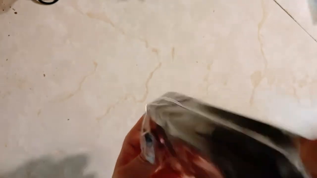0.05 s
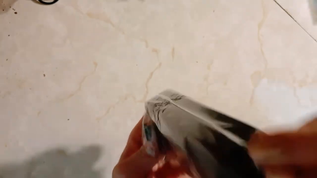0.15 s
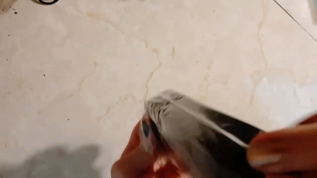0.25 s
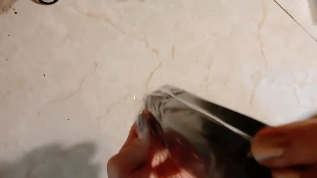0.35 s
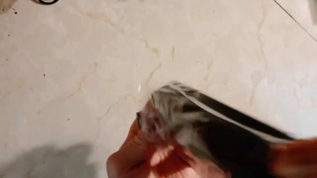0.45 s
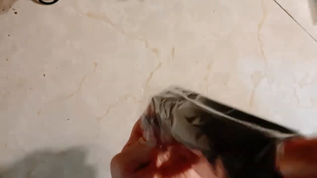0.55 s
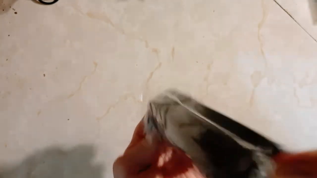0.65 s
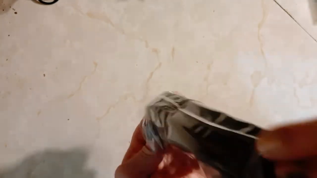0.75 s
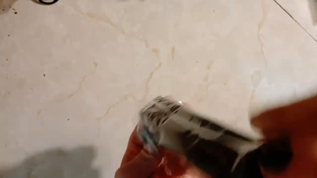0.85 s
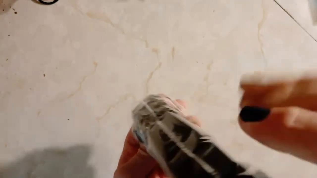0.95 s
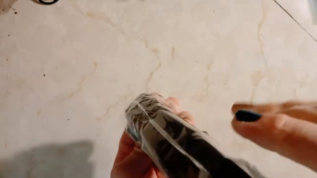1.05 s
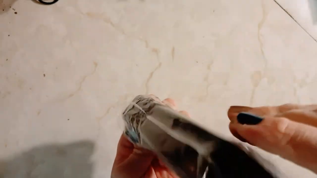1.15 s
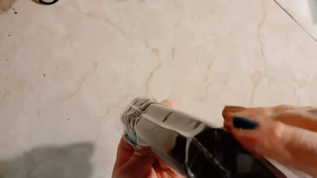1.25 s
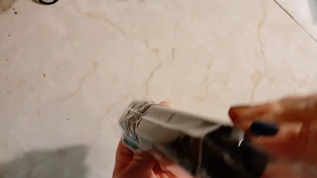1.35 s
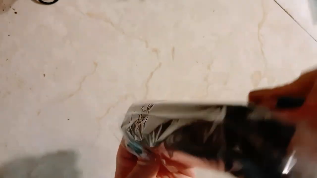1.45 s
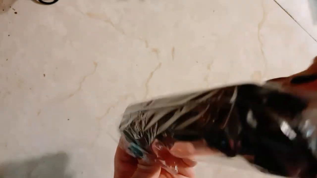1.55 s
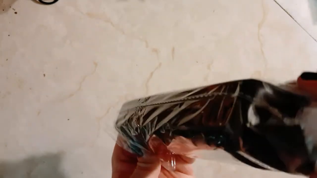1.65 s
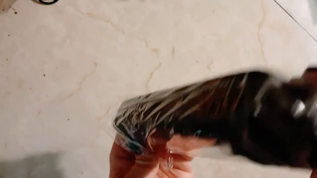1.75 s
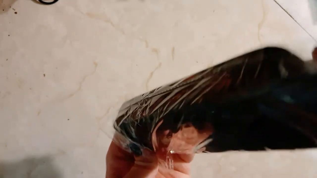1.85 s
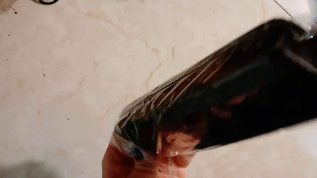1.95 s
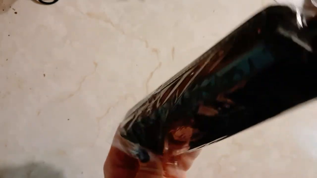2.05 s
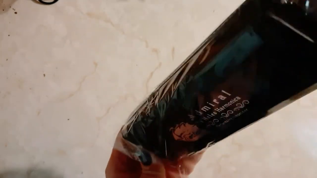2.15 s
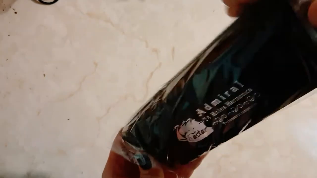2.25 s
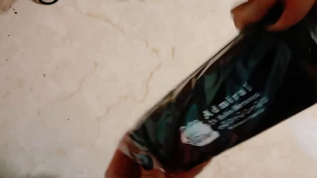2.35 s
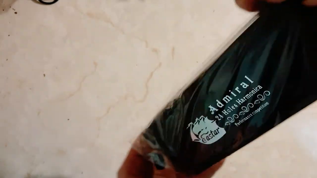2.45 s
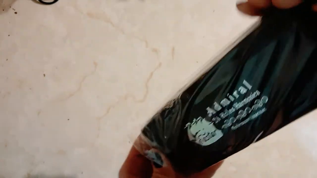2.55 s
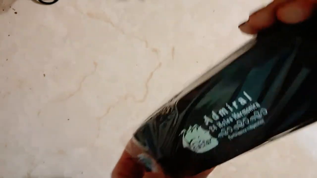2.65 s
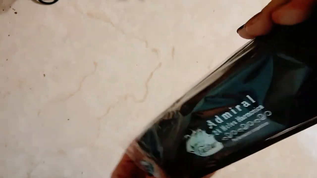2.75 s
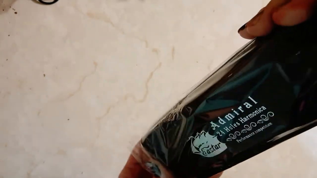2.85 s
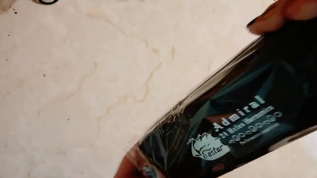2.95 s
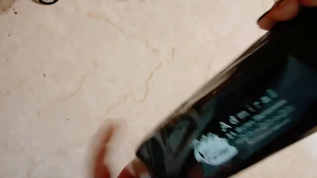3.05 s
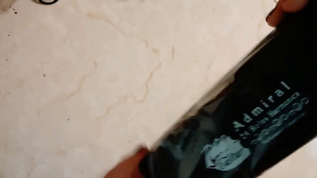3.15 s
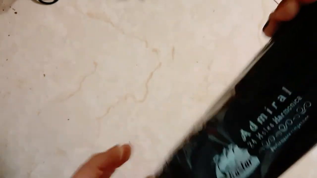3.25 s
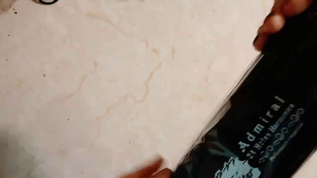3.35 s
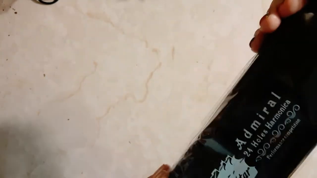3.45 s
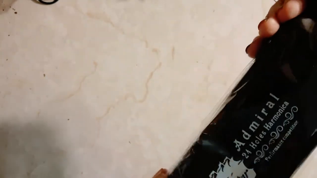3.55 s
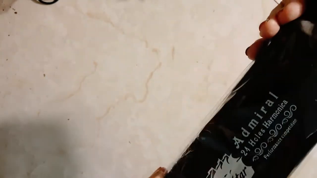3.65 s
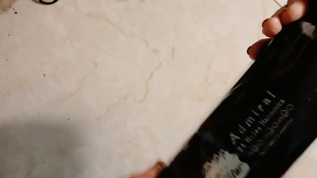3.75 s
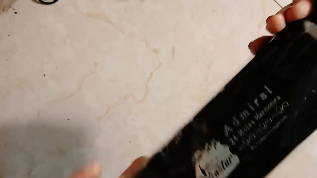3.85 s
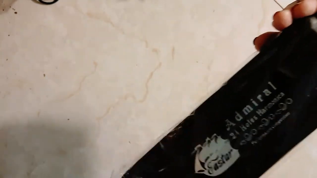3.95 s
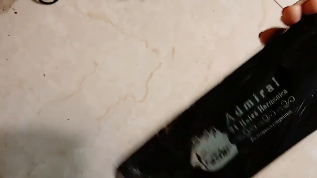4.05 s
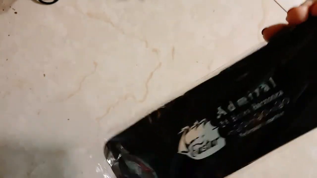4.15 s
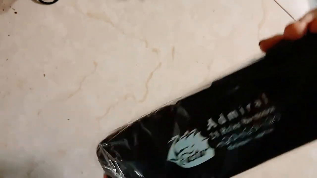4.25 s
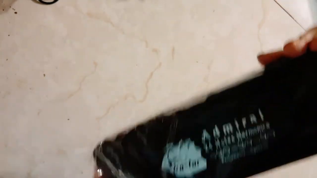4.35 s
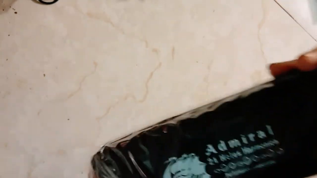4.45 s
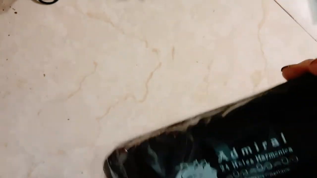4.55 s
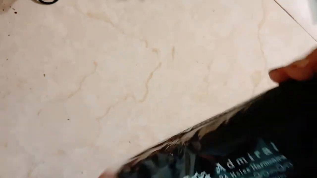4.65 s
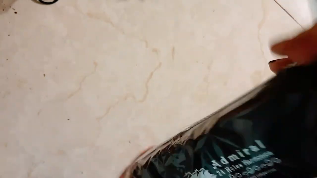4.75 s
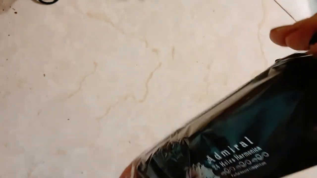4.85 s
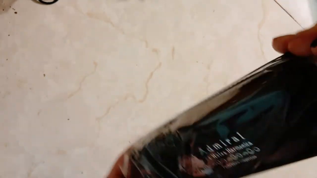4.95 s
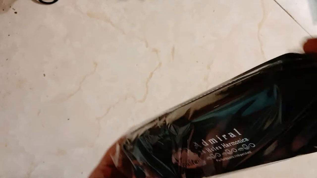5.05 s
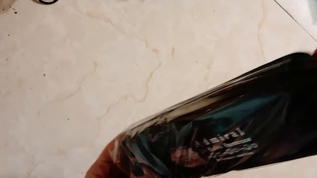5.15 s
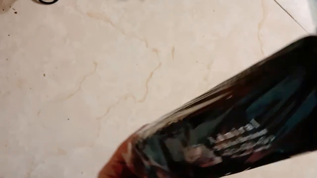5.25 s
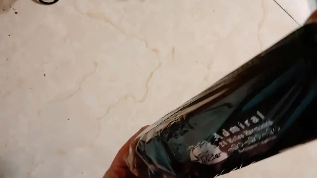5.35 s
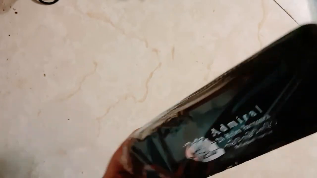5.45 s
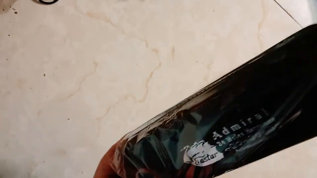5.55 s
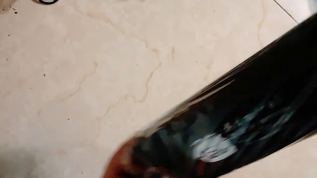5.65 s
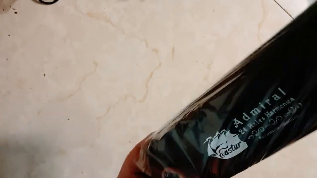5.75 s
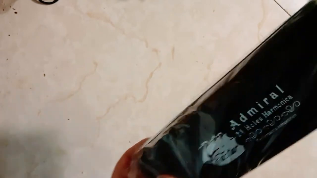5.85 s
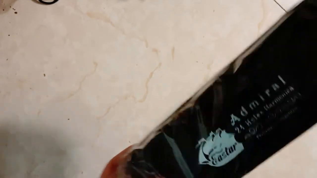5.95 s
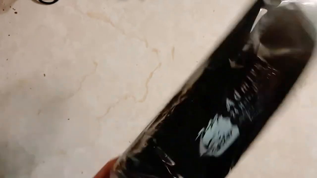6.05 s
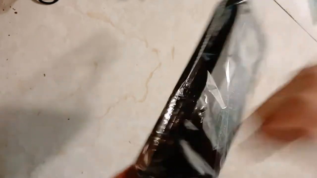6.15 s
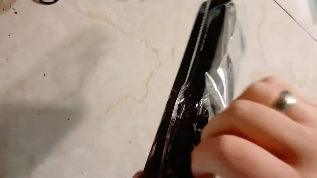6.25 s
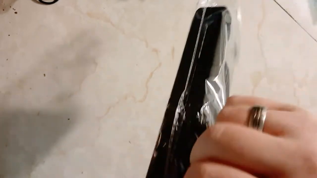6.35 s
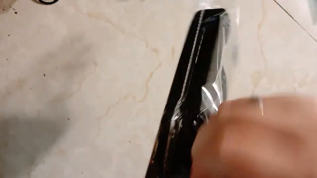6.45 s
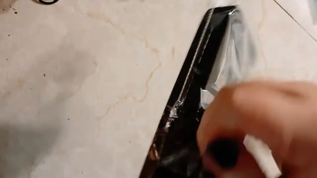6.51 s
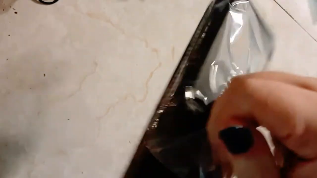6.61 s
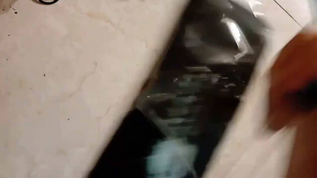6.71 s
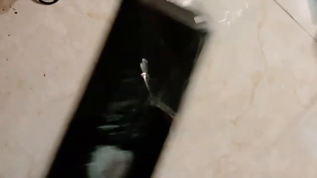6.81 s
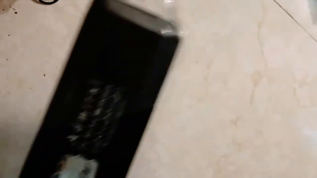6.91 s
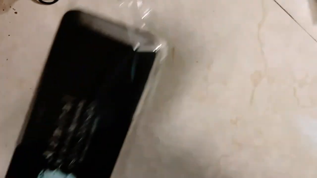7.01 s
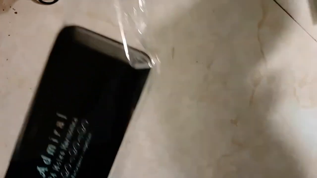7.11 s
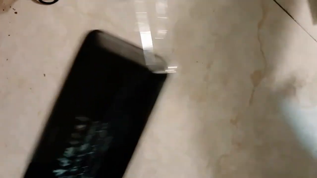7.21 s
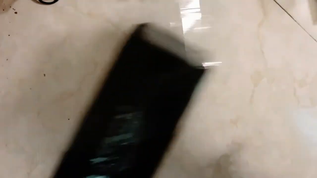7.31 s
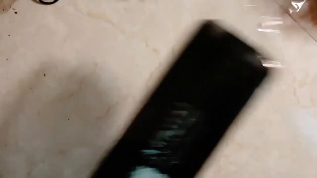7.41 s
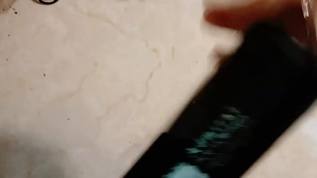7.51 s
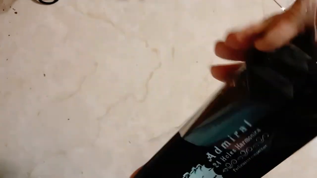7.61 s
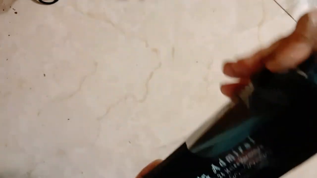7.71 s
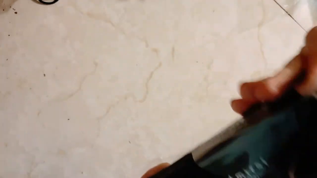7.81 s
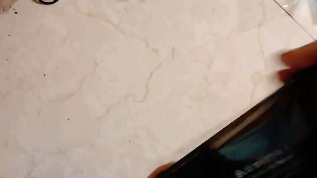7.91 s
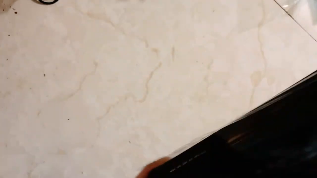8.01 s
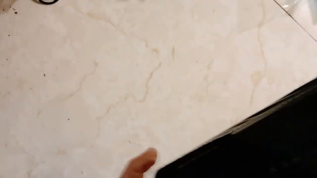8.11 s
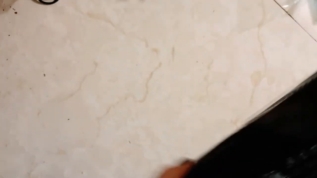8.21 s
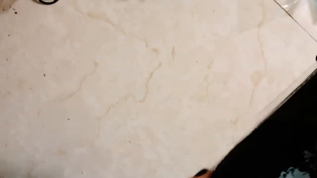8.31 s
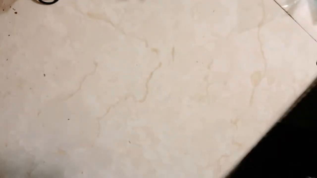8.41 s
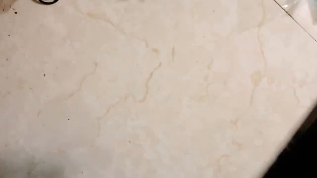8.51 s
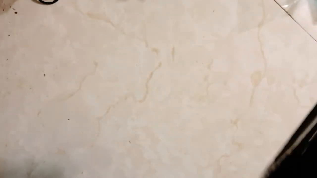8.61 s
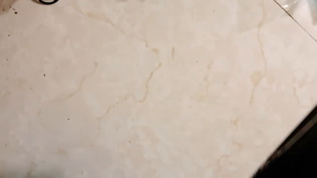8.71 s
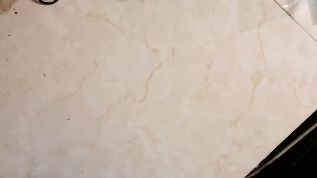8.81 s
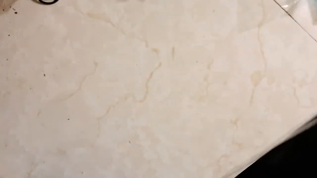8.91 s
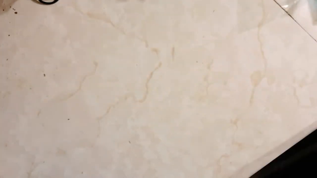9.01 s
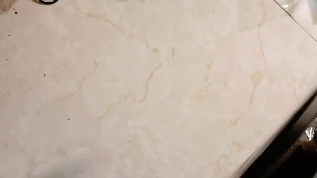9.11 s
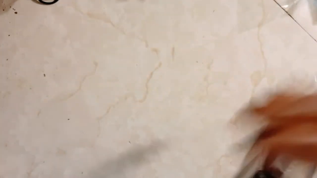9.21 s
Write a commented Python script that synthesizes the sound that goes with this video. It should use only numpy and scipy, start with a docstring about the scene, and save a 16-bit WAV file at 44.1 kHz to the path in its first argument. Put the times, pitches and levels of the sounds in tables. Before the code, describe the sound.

Stiff plastic film crackles and creases in quick handfuls close by, bursting into a violent ripping crunch late on, over faint room hum.

```python
"""Stiff film off a hard case

Hands crumple, tear and peel stiff plastic film, close to the left port of a phone, over a stone table.
Small creases (damped sines) follow the hands' effort; big ones snap as ring, crack and push; fingers bump the case.
The right port hears the film later, duller and more through the room; charged film pops in the left as leaky steps.
A mains hum of sines drones over noise-made room air, and the recorder's gain ducks after loud peaks."""
import sys
import numpy as np
from scipy import signal
from scipy.fft import rfft, irfft, next_fast_len
from scipy.io import wavfile
from scipy.ndimage import uniform_filter1d, map_coordinates

SR = 44100
rng = np.random.default_rng(int(sys.argv[2]) if len(sys.argv) > 2 else 0)


def materialize(psi):
    """Save the field psi as 16-bit PCM at rate SR to the path in sys.argv[1].

    A 1-D psi becomes a single channel; in a 2-D psi each row is a channel.
    """
    bounded = np.clip(np.atleast_2d(psi).T, -1, 1)
    quanta = np.round(bounded * 32767).astype(np.int16)
    wavfile.write(sys.argv[1], SR, quanta)


N = 408807

# mains hum partials: pitch_hz, level_db
HUM_PARTIALS = [(59.2, -48.5), (118.4, -62), (199.2, -68), (236.9, -69.5), (296, -83), (473, -73.5),
                (603, -79), (742, -73), (960, -82)]
# room air spectrum, rescaled later: freq_hz, relative_db
AIR_SPECTRUM = [(47, -32), (80, -19), (136, -5.5), (242, -14), (346, -23.5), (734, -21), (839, -20),
                (937, -19.5), (1460, -49), (4730, -70), (8050, -56), (12300, -53), (16000, -49)]
# left-right correlation of the air: freq_hz, correlation
AIR_LIKENESS = [(60, 0.59), (130, 0.78), (300, 0.016), (1000, 0.33)]
# steady rustle between crunches: time_s, level_db
RUSTLE_LEVEL = [(0.0, -30.5), (0.015, -43), (0.05, -42), (0.8, -71), (1.9, -80), (2.1, -47), (2.75, -48),
                (2.85, -57), (3.65, -52), (4.1, -62), (4.3, -67), (6.08, -44), (6.17, -74), (6.5, -43.5),
                (7.0, -49.5), (7.54, -78), (7.575, -64), (7.7, -43.5), (8.3, -76), (9.27, -50)]
# squeezes and pulls of the film: start_s, hold_s, bright_db, dull_re_bright_db
CRUNCHES = [(0.063, 0.027, -34.5, -5), (0.122, 0.065, -35.5, -5), (0.249, 0.006, -37.5, -5),
            (0.299, 0, -37.5, -6), (0.356, 0, -35.5, -6), (0.411, 0.0, -36, -5), (0.474, 0, -31.5, -6),
            (0.536, 0.0029, -32, -5.5), (0.592, 0, -34.5, -8.5), (0.664, 0, -33.5, -5),
            (0.741, 0.064, -39.5, -7.5), (0.893, 0.067, -44, -7), (1.001, 0.0069, -40, -8),
            (1.066, 0, -50, -15), (1.118, 0.0074, -44, -8.5), (1.198, 0.053, -41, -5),
            (1.328, 0.018, -40.5, -6), (1.347, 0.0074, -33.5, -8.5), (1.457, 0.11, -40.5, -11),
            (1.617, 0.06, -40.5, -8), (1.717, 0, -44, -14), (1.768, 0.0025, -44, -4), (1.83, 0, -42, -2.5),
            (1.912, 0.0, -50, -8), (1.968, 0.047, -36.5, -7), (2.223, 0.047, -35, -9.5),
            (2.385, 0.04, -35.5, -11), (2.45, 0.031, -40, -12), (2.564, 0, -45.5, 1.5),
            (2.677, 0.071, -42, -12), (2.756, 0.046, -53, -6), (2.93, 0.008, -48.5, -2),
            (2.999, 0.0034, -41.5, -8.5), (3.065, 0, -41.5, -11), (3.183, 0.068, -43.5, -15),
            (3.319, 0.0076, -38, -9.5), (3.393, 0.068, -48, -18), (3.48, 0.0066, -41, -23),
            (3.58, 0.0036, -27, -29), (3.792, 0.044, -42, -14), (3.915, 0.072, -38, -10.5),
            (4.075, 0.01, -47.5, -4), (4.182, 0, -53.5, -8), (4.289, 0, -33, -14), (4.353, 0.02, -36, -9.5),
            (4.442, 0, -35, -29), (4.545, 0.02, -43, -7), (4.648, 0, -39, -17), (4.727, 0.014, -40, -12),
            (4.784, 0.031, -41, -11), (4.864, 0.084, -41.5, -12), (5.004, 0.075, -45, -14),
            (5.117, 0.13, -48, -5), (5.246, 0, -35, -15), (5.286, 0, -35, -4.5), (5.378, 0, -46, -1),
            (5.505, 0.001, -38, -6), (5.616, 0.014, -58, -22), (5.673, 0.031, -39, -6.5),
            (5.808, 0, -51.5, 8.5), (5.996, 0.02, -33.5, -6.5), (6.175, 0.016, -55, -9),
            (6.238, 0, -56, -9), (6.303, 0.002, -62, 4), (6.37, 0.067, -53, -9), (6.47, 0.063, -40.5, -13),
            (6.533, 0.0039, -29, -1.5), (6.702, 0.075, -22, -6.5), (6.787, 0.003, -25, -7),
            (6.838, 0.057, -28, -6), (6.901, 0.046, -29.5, -10), (7.216, 0.022, -45.5, -10.5),
            (7.412, 0.0047, -57, -2), (7.51, 0.001, -63, -21), (7.603, 0, -30, -4),
            (7.781, 0.047, -37.5, -12), (7.949, 0.031, -32.5, -7.5), (8.133, 0.042, -40.5, -6.5),
            (8.268, 0.044, -49.5, -1), (8.426, 0.014, -44.5, -14), (8.488, 0.082, -49.5, -6),
            (8.613, 0.034, -48, -8), (8.752, 0.0076, -53.5, 1), (8.818, 0, -53, 4),
            (8.881, 0.001, -48.5, 0), (8.94, 0.05, -46, -5), (9.015, 0.017, -37, -9.5),
            (9.049, 0.0095, -35, -4), (9.082, 0, -35, -9.5), (9.131, 0.0078, -43, 1.5),
            (9.16, 0, -42.5, -5)]
# how freely the sheet flaps: time_s, level_db
FLAP_LEVEL = [(0, -50.5), (1.3, -49), (1.6, -55), (3.3, -60), (3.6, -49), (4.5, -56), (6.0, -70),
              (7.0, -51.5), (8.95, -61), (9.12, -56), (9.27, -48)]
# loudest creases, before colouring: start_s, level_db, pitch_hz, push_re_level_db
BIG_SNAPS = [(0.0606, -29, 7900.0, -8), (0.0965, -21, 8300, -13), (0.1245, -23, 7800.0, -17),
             (0.1346, -23, 10500.0, -15), (0.1826, -22, 10600.0, -14), (0.1898, -22, 7900.0, -15),
             (0.2419, -28, 8900.0, -23), (0.2904, -28, 10000.0, -19), (0.3053, -14, 8500, -8),
             (0.4015, -21, 7800.0, -13), (0.4852, -19, 6740, -9), (0.4937, -14, 7900.0, -31),
             (0.5005, -17.5, 6840, -27), (0.5302, -17, 6800.0, -26), (0.5345, -28, 3900.0, -21),
             (0.5395, -19.5, 10500.0, -16), (0.5976, -21, 11000.0, -14), (0.6808, -31, 6700.0, -10),
             (0.6971, -41, 5500.0, -14), (0.7392, -20.5, 11800.0, -35), (0.7517, -28, 6100.0, -10),
             (0.7679, -22, 11700.0, -20), (0.7793, -22.5, 10600.0, -25), (0.8359, -32, 7900.0, -15),
             (0.8731, -32, 7900.0, -18), (0.9049, -26, 6530, -21), (0.924, -32, 11400.0, -11),
             (0.9865, -31, 11800.0, -24), (0.9995, -32, 12700.0, -16), (1.0658, -22.5, 8300, -27),
             (1.11, -25, 7500.0, -13), (1.1198, -31, 8800.0, -14), (1.1325, -35, 8000.0, -21),
             (1.1729, -36, 9000.0, -21), (1.1799, -24.5, 7800.0, -30), (1.1961, -26, 12200.0, -23),
             (1.2196, -32, 7900.0, -20), (1.2295, -19, 12100.0, -24), (1.274, -22, 8000.0, -26),
             (1.2783, -18, 10000, -14), (1.3229, -27, 5900.0, -12), (1.331, -29, 6800.0, -21),
             (1.353, -20, 6800.0, -22), (1.3838, -23, 5500.0, -23), (1.4244, -28, 7000.0, -22),
             (1.4632, -35, 8700.0, -26), (1.4818, -27, 7900.0, -17), (1.5437, -36, 12200.0, -15),
             (1.5485, -23.5, 7400, -18), (1.6148, -23, 6540, -25), (1.6195, -26, 11600.0, -20),
             (1.6275, -21.5, 11300.0, -27), (1.7231, -35, 5300.0, -21), (1.7422, -23.5, 10200.0, -34),
             (1.7658, -27, 11500.0, -20), (1.7868, -30, 3100.0, -18), (1.8083, -32, 12500.0, -21),
             (1.857, -24, 4300.0, -28), (1.8964, -39, 8000.0, -17), (1.9042, -19.5, 3320, -23),
             (1.9379, -29, 7400.0, -18), (1.9465, -29, 11700.0, -23), (1.9657, -24, 11800.0, -18),
             (1.9773, -20, 11500.0, -29), (1.9848, -18.5, 7500.0, -9), (2.0192, -22, 10200.0, -18),
             (2.0253, -19, 11700.0, -14), (2.0451, -32, 10400.0, -8), (2.0529, -25, 3360, -22),
             (2.0664, -26, 7300.0, -21), (2.0901, -32, 9700.0, -24), (2.1206, -21, 11900.0, -10),
             (2.1254, -32, 11500.0, -20), (2.1376, -26.5, 9300.0, -18), (2.1458, -25, 9000.0, -27),
             (2.1622, -31, 5400.0, -22), (2.1748, -16, 7700, -31), (2.1971, -29, 3300.0, -18),
             (2.2219, -32, 11400.0, -21), (2.2383, -19, 7400, -26), (2.2626, -18, 10500.0, -19),
             (2.3159, -27, 7750, -16), (2.3362, -29, 9900.0, -26), (2.3665, -29, 9600.0, -22),
             (2.3917, -25, 7800.0, -19), (2.398, -20, 8300.0, -13), (2.4156, -23, 4400.0, -25),
             (2.4495, -27, 11500.0, -21), (2.4588, -22, 6500.0, -10), (2.4861, -26, 12500.0, -26),
             (2.4916, -13.5, 10500, -40), (2.5004, -28, 6700.0, -23), (2.5158, -33, 10400.0, -24),
             (2.5281, -27, 10400.0, -15), (2.5362, -29.5, 10400.0, -17), (2.5577, -23, 12200.0, -17),
             (2.5719, -20.5, 3430, -17), (2.6001, -21.5, 11000.0, -27), (2.6418, -36, 7900.0, -23),
             (2.6521, -24.5, 10400.0, -31), (2.6587, -37, 3200.0, -20), (2.6834, -30, 4200.0, -17),
             (2.6877, -22.5, 11800.0, -6), (2.692, -22, 11100.0, -9), (2.713, -24, 9900.0, -28),
             (2.7272, -32, 11900.0, -27), (2.7481, -34, 12000.0, -17), (2.7643, -33, 10500.0, -22),
             (2.773, -27, 6950, -15), (2.8802, -43, 9500.0, -21), (2.932, -43, 10500.0, -20),
             (2.9409, -35.5, 3000.0, 5), (2.9912, -33.5, 5000.0, -3), (3.1742, -21, 6800, -23),
             (3.1877, -19, 13000.0, -16), (3.2098, -25.5, 11700.0, -25), (3.2299, -37, 10300.0, -23),
             (3.2342, -34, 9600.0, -20), (3.2483, -30, 9000.0, -19), (3.288, -23, 10800.0, -22),
             (3.314, -23.5, 4700.0, -12), (3.3623, -30, 11800.0, -25), (3.3833, -23, 4540, -24),
             (3.3962, -22, 8700.0, -26), (3.4057, -27, 11000.0, -25), (3.4175, -20.5, 11300.0, -28),
             (3.4418, -14.5, 10000.0, -38), (3.4874, -29, 11200.0, -25), (3.5029, -34, 10200.0, -21),
             (3.5231, -28, 7800.0, -28), (3.5323, -32, 8800.0, -27), (3.5383, -28, 10400.0, -23),
             (3.5507, -27, 11700.0, -15), (3.5572, -25, 4000.0, -6), (3.5615, -5, 10000, -18),
             (3.569, -11.5, 9900.0, -18), (3.5936, -23, 10800.0, -18), (3.6819, -32, 11300.0, -20),
             (3.7008, -26, 10200.0, -17), (3.7141, -20.5, 12100.0, -16), (3.7492, -25, 11500.0, -25.5),
             (3.8048, -30, 4400.0, -21), (3.8244, -34, 9970, -21), (3.8496, -28, 9700.0, -24),
             (3.875, -33, 11000.0, -26), (3.8893, -29.5, 4200.0, -25), (3.8938, -21.5, 9620, -26),
             (3.9211, -27, 11100.0, -24), (3.9281, -13.5, 9700, -26), (3.9546, -28, 5300.0, -19),
             (3.9638, -25, 10900.0, -29), (4.0103, -34, 8800.0, -21), (4.0437, -29, 5600.0, -22),
             (4.079, -28.5, 6500.0, -8), (4.1684, -33.5, 8800.0, -27), (4.2232, -30, 11600.0, -17),
             (4.2275, -28.5, 4300.0, -5), (4.2562, -29, 3440, -15), (4.2724, -33, 11300.0, -24),
             (4.2874, -24.5, 4060, -11), (4.2987, -21, 4300.0, -20), (4.3163, -38, 5300.0, -20),
             (4.339, -29, 6700.0, -20), (4.3446, -33, 12300.0, -23), (4.3519, -27, 11000.0, -19),
             (4.3816, -30, 4700.0, -8), (4.3866, -23, 3900.0, -20), (4.4265, -28, 11000.0, -24),
             (4.4449, -22, 11400.0, -21), (4.4543, -19.5, 11900.0, -31), (4.5044, -40, 6200.0, -21),
             (4.5586, -28, 10100.0, -27), (4.5734, -25, 5300.0, -6), (4.5817, -33, 7000.0, -14),
             (4.6209, -44, 9300.0, -19), (4.6412, -21.5, 10000.0, -20), (4.6566, -34, 11700.0, -23),
             (4.6676, -31, 9000.0, -25), (4.6921, -39, 4300.0, -21), (4.7141, -18, 9600.0, -31),
             (4.73, -27, 11300.0, -26), (4.7494, -25, 11300.0, -17), (4.7557, -26, 3400.0, -19),
             (4.7824, -27, 6200, -35), (4.7883, -25, 11800.0, -28), (4.8163, -34, 11200.0, -23),
             (4.8381, -30, 4300.0, -15), (4.8583, -32, 4300.0, -21), (4.8729, -22, 6500.0, -29),
             (4.8793, -29, 3400.0, -25), (4.8934, -34, 11800.0, -20), (4.9055, -27, 11300.0, -22),
             (4.9134, -19.5, 4260, -23), (4.952, -36, 5500.0, -26), (4.974, -23, 10000.0, -6),
             (4.9806, -33, 9100.0, -18), (4.9992, -21.5, 4380, -27), (5.0149, -30, 10000.0, -21),
             (5.028, -29, 11500.0, -27), (5.0451, -25.5, 3380, -20), (5.0517, -37, 5300.0, -23),
             (5.0713, -30, 12300.0, -19), (5.0836, -29, 11500.0, -30), (5.1045, -27.5, 5300.0, -24),
             (5.1161, -26, 3200.0, -18), (5.1293, -33, 11800.0, -26), (5.1426, -33, 11300.0, -25),
             (5.1483, -30, 11800.0, -26), (5.1603, -18, 10500, -28), (5.1891, -24, 10700.0, -33),
             (5.2121, -29, 6200.0, -21), (5.2263, -29, 8600.0, -18), (5.2429, -30, 10300.0, -20),
             (5.2502, -23.5, 9300.0, -17), (5.2568, -25, 10400.0, -25), (5.2642, -23, 10500.0, -26),
             (5.2846, -18, 3330, -18), (5.2887, -27, 3400.0, -4), (5.3231, -36, 3200.0, -18),
             (5.3643, -28, 3280, -14), (5.385, -29, 8700.0, -20), (5.4079, -37, 4200.0, -20),
             (5.4197, -27.5, 6000.0, -25), (5.4345, -45, 5300.0, -15), (5.4439, -37, 3200.0, -15),
             (5.4659, -31, 11800.0, -21), (5.4774, -21, 10500.0, -30), (5.4883, -21, 10900.0, -25),
             (5.4971, -20, 10400.0, -23), (5.5035, -20, 9100, -25), (5.5118, -26, 9900.0, -27),
             (5.5164, -27, 7500.0, -19), (5.5705, -25, 11900, -26), (5.5746, -29, 6800.0, -11),
             (5.5895, -29, 7900.0, -23), (5.6114, -16, 3900, -28), (5.6236, -32, 7800.0, -26),
             (5.6818, -30, 5300.0, -22), (5.705, -25, 3200.0, -27), (5.7125, -33, 11800.0, -16),
             (5.7206, -21.5, 3170, -11), (5.7337, -26, 7500.0, -11), (5.7507, -27, 12100.0, -31),
             (5.7683, -26, 10600.0, -23), (5.7732, -24, 11100.0, -27), (5.798, -25, 12000.0, -15),
             (5.8114, -17, 3170, -14), (5.827, -33, 6800.0, -18), (5.852, -33, 3000.0, -27),
             (5.8597, -34, 3400.0, -20), (5.8674, -28, 11600.0, -23), (5.8865, -28, 10300.0, -22),
             (5.8916, -29, 11500.0, -31), (5.9056, -26, 10200.0, -23), (5.9189, -26, 6100.0, -21),
             (5.9295, -26, 10100.0, -22), (5.9547, -28, 11100.0, -25), (5.9683, -28, 7500.0, -15),
             (5.9878, -32, 6800.0, -22), (6.001, -18, 4220, -24), (6.0064, -31, 11600.0, -16),
             (6.0381, -29, 11200.0, -21), (6.0728, -28, 4400.0, -18), (6.0908, -28, 11900.0, -27),
             (6.103, -40, 3300.0, -15), (6.1107, -31, 11300.0, -23), (6.2411, -39, 10900.0, -17),
             (6.2837, -49, 9500.0, -16), (6.2901, -29, 9900.0, -20), (6.2959, -23, 9700, -28),
             (6.3361, -20, 9700, -30), (6.3658, -32, 9800.0, -25), (6.3814, -31, 9900.0, -20),
             (6.3962, -34, 11400.0, -27), (6.438, -25, 5860, -24), (6.4462, -20, 11700, -14),
             (6.4617, -17, 10000.0, -17), (6.4828, -33, 9300.0, -22), (6.4974, -12, 11600, -29),
             (6.5143, -22, 11400.0, -25), (6.5423, -17, 10000.0, -19), (6.5532, -23, 4400.0, -27),
             (6.5702, -15.5, 10000.0, -18), (6.5992, -18.5, 6900.0, -20), (6.6237, -18, 7550, -9),
             (6.6415, -16, 7600, -21), (6.6554, -23, 5600.0, -20), (6.6737, -11, 9000, -20),
             (6.6903, -17, 3000.0, -4), (6.7064, -4, 12000.0, -9), (6.7212, -6, 10600.0, -8),
             (6.7287, -6, 10600.0, -6), (6.7369, 1, 12100.0, -16), (6.751, -6.5, 3300.0, -10),
             (6.7741, -10, 3180, -5), (6.7836, -1, 9200, -14), (6.812, -9, 10800.0, -19),
             (6.8288, 0, 9850, -9), (6.8528, -3.5, 8500.0, 0), (6.8694, -4.5, 11100, -22),
             (6.8856, -21, 11400.0, -19), (6.9474, -15, 6800.0, -5), (6.9522, -12.5, 10100.0, -4),
             (6.9641, -11.5, 10300.0, -22), (7.0799, -36, 3400.0, -16), (7.1013, -40, 7900.0, -16),
             (7.1333, -37, 7600.0, -20), (7.1642, -37, 12900.0, -27), (7.1971, -42, 12600.0, -18),
             (7.2046, -36, 5800.0, -16), (7.2171, -38, 7000.0, -22), (7.2274, -41, 10900.0, -22),
             (7.2442, -39, 9800.0, -18), (7.3104, -36, 10100, -31), (7.4165, -42, 11400, -19),
             (7.4215, -30, 11600, -18), (7.5112, -42, 12000.0, -13), (7.5174, -39, 12100.0, -23),
             (7.5839, -34, 10500.0, -17), (7.5915, -20, 13100.0, -15), (7.6079, -23, 7800.0, -5),
             (7.6124, -21, 3400.0, -12), (7.6195, -28, 3200.0, -9), (7.6482, -23.5, 10800.0, -15),
             (7.6671, -30, 11600.0, -18), (7.7196, -31, 11800.0, -18), (7.7339, -29, 10700.0, -6),
             (7.7415, -29, 3220, -23), (7.759, -34, 11100.0, -17), (7.7795, -25, 11200.0, -24),
             (7.786, -29, 3500.0, -19), (7.7961, -11, 8500, -44), (7.8023, -17, 8100.0, -24),
             (7.8338, -24, 9900.0, -29), (7.8904, -26.5, 6000.0, -16), (7.915, -35, 3500.0, -28),
             (7.9371, -25.5, 4300.0, -11), (7.9416, -26, 5200.0, -20), (7.9639, -28, 8200.0, -22),
             (7.9887, -23, 11300.0, -19), (7.9974, -27, 9600.0, -13), (8.0039, -24, 11200.0, -16),
             (8.0445, -32, 10200.0, -20.5), (8.0574, -34, 4200.0, -15), (8.0831, -32, 3520, -16),
             (8.1063, -32, 11700.0, -21), (8.1349, -27, 5300.0, -21), (8.1431, -20.5, 7700.0, -20),
             (8.1532, -23, 3480, -20), (8.1755, -21.5, 12000.0, -14), (8.1917, -37, 3100.0, -13),
             (8.2133, -31, 11800.0, -14), (8.229, -34, 9000.0, -14), (8.2386, -34, 5800.0, -17),
             (8.2563, -35, 5200.0, -17), (8.2746, -35, 8400.0, -27.5), (8.2921, -33.5, 3300.0, -3),
             (8.3045, -39, 8600.0, -12), (8.3174, -32, 11200.0, -22), (8.3401, -40, 10900.0, -18),
             (8.3912, -44, 11600.0, -19), (8.3983, -29, 7500.0, -27), (8.423, -34, 11600.0, -20),
             (8.435, -26, 8900.0, -29), (8.4754, -39, 5300.0, -11), (8.4948, -22, 7050, -33),
             (8.5068, -35, 3400.0, -20), (8.5229, -38, 3600.0, -21), (8.5398, -32, 6000.0, -14),
             (8.5569, -36, 11800.0, -17), (8.5791, -34, 10600.0, -5), (8.6168, -28.5, 10100.0, -23),
             (8.6339, -28, 12900.0, -13), (8.6388, -33, 9000.0, -15), (8.6749, -35.5, 5300.0, -14),
             (8.6932, -31, 7440, -28), (8.7227, -29.5, 5230, -27), (8.7311, -31, 8000, -27),
             (8.752, -36, 4200.0, -18), (8.7751, -32, 10900.0, -10), (8.7818, -35, 5300.0, -23),
             (8.831, -33, 8000.0, -15), (8.8602, -44, 11800.0, -26), (8.8733, -26.5, 7440, -28),
             (8.9265, -21, 8850, -21), (8.9387, -30, 7500.0, -14), (8.9682, -21, 5900, -27),
             (9.0119, -27, 7500.0, -29), (9.0215, -29, 8900.0, -21), (9.0322, -28, 10100.0, -19),
             (9.0373, -20, 7200.0, -11), (9.0465, -19.5, 10400.0, -17), (9.054, -20.5, 3400.0, -13),
             (9.0629, -19, 7400.0, -19), (9.0828, -24, 7000.0, -8), (9.0927, -28, 10000.0, -21),
             (9.1089, -33, 7100.0, -19), (9.1669, -20.5, 9000.0, -17), (0.1509, -29, 10200, -21),
             (0.1659, -24, 11000, -21), (0.2342, -27, 11400, -24), (0.3165, -24, 11000, -22),
             (0.3711, -34, 8300, -18), (0.4185, -24, 6700, -19), (0.4732, -23, 12700, -17),
             (0.4769, -22, 11000, -21), (0.6107, -26, 10300, -18), (0.6564, -25, 11700, -24),
             (0.9081, -25, 11700, -21), (0.9662, -35, 7400, -4), (1.2977, -34, 8400, -17),
             (1.3273, -27, 12200, -20), (1.3873, -27, 10900, -21), (1.4415, -39, 7200, -28),
             (1.7162, -30, 11500, -19), (1.784, -31, 12900, -15), (1.8331, -33, 9800, -19),
             (1.901, -22, 10500, -19), (1.9555, -30, 10500, -20), (1.9692, -25, 11400, -27),
             (2.0594, -27, 6400, -20), (2.1546, -24.5, 3600, -15), (2.1913, -26, 11200, -17),
             (2.3134, -24, 6500, -22), (2.3294, -32, 4000, -23), (2.381, -25.5, 11000, -9),
             (2.9149, -39, 11700, -27), (3.0796, -29, 10700, -17), (3.1605, -36, 3800, -14),
             (3.206, -28, 12900, -26), (3.271, -38, 5000, -18), (3.2808, -31, 7100, -18),
             (3.3588, -28, 11500, -31), (3.4903, -27, 11700, -26), (3.5443, -33, 11700, -19),
             (3.9664, -30, 11400, -27), (3.9756, -30, 7400, -25), (4.3285, -39, 11900, -24),
             (4.3651, -21, 11700, -17), (4.4422, -23, 7100, -27), (4.5237, -39, 7400, -23),
             (4.934, -30, 3800, -13), (4.9469, -27, 5500, -23), (5.0748, -31, 6400, -21),
             (5.1005, -32, 7900, -19), (5.1573, -23, 11700, -13), (5.3394, -32, 11400, -16),
             (5.3565, -35, 3400, -22), (5.6, -40.5, 2900, -4), (5.6667, -29, 11000, -13),
             (5.6899, -25, 9600, -23), (5.731, -22, 2860, -10), (5.9605, -30, 10900, -26),
             (5.9632, -31, 9500, -24), (6.3624, -35, 9100, -21), (6.6606, -17, 9800, -18),
             (6.686, -17, 9000, -15), (6.7033, -10, 10300, -21), (7.1366, -39, 11400, -25),
             (7.6386, -27, 11500, -20), (7.6703, -30, 6900, -18), (7.7171, -34, 2900, -21),
             (7.7922, -26, 11200, -26), (7.8686, -28, 11500, -27), (8.08, -32, 12200, -19),
             (8.4208, -31, 12400, -30), (8.8215, -39, 11000, -13), (9.0141, -24, 8500, -22),
             (9.131, -28, 2900, -13), (9.1622, -33, 6000, -15), (9.2588, -29, 10900, -24)]
# fingers bumping the case, before colouring: start_s, level_db, centre_pitch_hz
KNOCKS = [(0.075, -32, 940), (0.256, -36, 970), (0.483, -25.5, 960), (0.596, -33, 980), (0.675, -30, 950),
          (0.965, -41, 1400), (0.996, -34, 920), (1.201, -31.5, 725), (1.228, -34, 470), (1.359, -42, 980),
          (2.043, -33.5, 1420), (2.173, -34, 940), (2.399, -30, 974), (2.526, -38, 950),
          (2.747, -37.5, 950), (5.281, -35, 960), (5.795, -33, 1280), (5.808, -53, 1000), (6.007, -32, 950),
          (6.043, -33.5, 715), (6.698, -20, 980), (6.785, -15.5, 980), (6.866, -16, 980),
          (6.955, -23, 1300), (7.568, -38, 1030), (7.61, -28.5, 1250), (7.717, -38, 1290),
          (7.993, -32.5, 1000), (9.128, -34.5, 977)]
# charge pops at the left port: start_s, step_db, signed_direction_factor, decay_ms
CHARGE_POPS = [(0.305, -12, 0.34, 1), (3.383, -28.5, 0.98, 2.4), (3.562, 7, 0.78, 0.83),
               (3.569, -10, -1.15, 0.8), (6.462, -14.5, 0.81, 0.66), (6.6738, -9, 0.84, 1.5),
               (6.6904, -1, -0.67, 2.2), (6.707, -0.5, 1, 1.4), (6.7214, -1.5, -0.77, 1.5),
               (6.7287, 11.5, -0.96, 0.34), (6.737, -9, 1, 1.9), (6.751, 1.5, 0.96, 3.3),
               (6.784, -2, 1, 2.4), (6.829, 9.5, -1.23, 2), (6.8525, 1, -1.2, 2), (6.869, -10, 1, 2.1),
               (6.9522, 1.5, 1, 2.1)]
# film colour, both ports: freq_hz, relative_db
FILM_COLOUR = [(100, -29.5), (250, -13.5), (550, -10.5), (960, -7.5), (1300, -7.5), (2000, -4.5),
               (4800, -3.5), (10800, -2), (13000, -4), (15700, -17.5), (16000, -28)]
# shadow of the phone: freq_hz, left_over_right_db
PHONE_SHADOW = [(60, 43), (110, 39), (200, -28), (380, 9), (700, -2.5), (1290, -1.5), (2380, 1),
                (4400, 0.5), (8120, 3.5), (15000, 13.5)]
# peaks and dips at the left port: centre_hz, width_hz, gain_db
LEFT_BELLS = [(1550, 130, 4.5), (1950, 75, 3.5), (2230, 420, -0.5), (2930, 280, -5)]
# peaks and dips on the way to the right port: centre_hz, width_hz, gain_db
RIGHT_BELLS = [(380, 60, -3), (510, 40, 8), (565, 40, -7), (680, 50, -7), (755, 40, 3), (785, 20, -5),
               (850, 40, -7), (968, 60, 12.5), (1090, 180, 6), (1255, 40, 4), (1490, 50, 2), (1811, 60, 3),
               (2080, 250, -5), (2300, 80, -4), (2436, 100, 3), (3030, 120, 5.5), (3300, 300, -3),
               (4010, 140, 6), (4720, 200, -5), (7200, 1500, 2), (11700, 1500, -3)]
# room decay: freq_hz, t60_s
ROOM_DECAY = [(300, 0.22), (2000, 0.28), (8000, 0.22), (15000, 0.038)]
# short echoes among hands, case and table: freq_hz, t60_s
NEAR_DECAY = [(300, 0.036), (15000, 0.032)]

RISE_DB_PER_S, FALL_DB_PER_S = 522, 300  # crunch slopes
RUSTLE_DULL_DB = -8  # dull re bright creases in the rustle
FLAP_GROWTH = 0.87  # flap dB per dull dB
TICKS_PER_S, TICK_DB, TICK_SPREAD_DB = 40, -45, 2
TICK_GROWTH, TICK_EFFORT_REF_DB = 0.83, -42  # tick dB per effort dB, from this effort
TICK_LO_HZ, TICK_HI_HZ, TICK_PUSH_DB = 3900, 12200, -16
WIDE_HZ, WIDE_CYCLES = 4200, 7  # creases below this are wide: softer crack, longer ring
KNOCK_CYCLES, KNOCK_SPREAD = 1.57, 0.25  # decay in cycles; log-pitch scatter, +/-
DIRECT_HZ, TABLE_S = 2480, 0.001535  # right-port shading corner; table bounce delay
SCATTER_HZ = 1520  # waves below pass the hands with few echoes
TOP_HZ = 16450  # band limit


def amp(db):
    """Decibels to gain."""
    return 10 ** (np.asarray(db) / 20)


def unit(x):
    """Scaled to rms 1."""
    return x / np.sqrt(np.mean(x ** 2) + 1e-20)


def along(points, hz):
    """(Hz, value) points interpolated on a log frequency axis."""
    f, v = np.transpose(points)
    return np.interp(np.log(hz + 1), np.log(f + 1), v)


def track(points):
    """(s, value) points interpolated at every sample."""
    return np.interp(np.arange(N) / SR, *np.transpose(points))


def bells(rows, hz):
    """Gain of (Hz, width Hz, dB) peaks and dips."""
    return amp(sum(db / (1 + ((hz - centre) / width * 2) ** 2) for centre, width, db in rows))


def wobble(rate):
    """Smooth random curve, rate knots a second."""
    knots = rng.standard_normal(int(N * rate / SR) + 4)
    return map_coordinates(knots, [np.arange(N) * rate / SR])


def filtered(x, response):
    """x times a complex response of frequency."""
    m = next_fast_len(N + SR // 2)
    return irfft(rfft(x, m) * response(np.fft.rfftfreq(m, 1 / SR)), m)[..., :N]


def coloured(x, gain):
    """Causal colouring: minimum-phase pulse of gain(Hz), by folding its cepstrum."""
    size = 4096
    cepstrum = irfft(np.log(np.maximum(gain(np.fft.rfftfreq(size, 1 / SR)), 1e-6)))
    cepstrum[1:size // 2] *= 2
    cepstrum[size // 2 + 1:] = 0
    pulse = irfft(np.exp(rfft(cepstrum)))[:size // 2]
    return signal.fftconvolve(x, pulse)[:N]


def grains(start_s, size, hz, cycles, phase, count):
    """Damped sines, each falling by 1/e in the given cycles; count samples each."""
    t = np.arange(count) / SR
    decay = np.exp(-t * (hz / cycles)[:, None])
    wave = size[:, None] * np.sin(2 * np.pi * (hz[:, None] * t + phase[:, None])) * decay
    at = np.round(start_s * SR).astype(int)[:, None] + np.arange(count)
    return np.bincount(at.ravel(), wave.ravel(), N + SR)[:N]


def echoes(x, decay, channels, size, count):
    """Diffuse echoes dying by frequency; the film moves, so every count samples meet new ones."""
    parts = np.pad(x, (0, -N % count)).reshape(-1, 1, count)
    noise = rng.standard_normal((len(parts), channels, size))
    hz, t, spectrum = signal.stft(noise, SR, nperseg=128)
    fade = amp(-60 * t / along(decay, hz)[:, None])
    tails = signal.istft(spectrum * fade, SR, nperseg=128)[1]
    tails /= np.linalg.norm(tails, axis=2, keepdims=True)
    wet = signal.fftconvolve(parts, tails, axes=2)
    out = np.zeros((channels, N + SR))
    for k, part in enumerate(wet):
        out[:, k * count:][:, :part.shape[1]] += part
    return out[:, :N]


def background():
    """Mains hum in phase at both ports, over partly correlated room air."""
    t = np.arange(N) / SR
    hum = np.zeros(N)
    for hz, db in HUM_PARTIALS:
        level = np.sqrt(2) * amp(db + 0.18 * wobble(9.2))
        hum += level * np.sin(2 * np.pi * (hz * t + 0.043 * wobble(5)))

    def mid_side_gain(hz):
        angle = np.arccos(np.clip(along(AIR_LIKENESS, hz), -1, 1)) / 2
        return amp(along(AIR_SPECTRUM, hz)) * [np.cos(angle), np.sin(angle)]

    mid, side = filtered(rng.standard_normal((2, N)), mid_side_gain)
    air = amp(-57.0) * unit(np.array([mid + side, mid - side]))
    return hum * amp([[-1.3], [1.2]]) + air * amp([[-1.5], [1.5]])


def effort():
    """Bright and dull crease levels in dB: powers of rising, held, falling crunches plus rustle."""
    t = np.arange(0, N / SR + .002, .001)
    start_s, hold_s, db, dull_db = np.transpose(CRUNCHES)[..., None]
    rise_db = RISE_DB_PER_S * np.maximum(start_s - t, 0)
    fall_db = FALL_DB_PER_S * np.maximum(t - start_s - hold_s, 0)
    crunch = amp(2 * (db - rise_db - fall_db))  # power
    rustle = amp(2 * np.interp(t, *np.transpose(RUSTLE_LEVEL)))
    bright = rustle + crunch.sum(axis=0)
    dull = rustle * amp(2 * RUSTLE_DULL_DB) + (crunch * amp(2 * dull_db)).sum(axis=0)
    return [np.interp(np.arange(N) / SR, t, 10 * np.log10(power)) for power in (bright, dull)]


def creases(lo_hz, hi_hz, per_second, spread_db, cycles):
    """Small creases buckling at random times, pitches and sizes; rms 1."""
    u = rng.random((int(per_second * N / SR), 4))
    hz = lo_hz + (hi_hz - lo_hz) * u[:, 1]
    db = np.minimum(-spread_db * np.log(u[:, 2] + 1e-9), 4 * spread_db)
    count = int(8 * SR / (lo_hz + 1500))
    return unit(grains(u[:, 0] * N / SR, amp(db) * np.sqrt(hz), hz, cycles, u[:, 3], count))


def crackle():
    """The hands' effort drives small bright creases, wide dull ones and the flapping sheet."""
    bright_db, dull_db = effort()
    # creases set each other off, at all sizes together
    clumps = 0.15 * wobble(25) + 1.1 * wobble(90) + 0.57 * wobble(300)
    bright = creases(lo_hz=2390, hi_hz=14200, per_second=3000, spread_db=4.5, cycles=0.85)
    dull = creases(lo_hz=686, hi_hz=2900, per_second=1800, spread_db=3, cycles=0.46)
    flap = creases(lo_hz=120, hi_hz=800, per_second=600, spread_db=1.5, cycles=1.0)
    flap_db = track(FLAP_LEVEL) + FLAP_GROWTH * (dull_db + 51.0)
    flexed = amp(dull_db + 2.5) * dull + amp(flap_db) * flap
    return amp(bright_db - 1.5 + 1.6 * clumps) * bright + amp(1.73 * clumps - 1.5) * flexed


def ticks():
    """Rows like BIG_SNAPS: lesser creases snapping at random, louder with effort."""
    u = rng.random((int(TICKS_PER_S * N / SR), 4))
    start_s = .01 + u[:, 0] * (N / SR - .03)
    effort_db = effort()[0][(start_s * SR).astype(int)]
    db = TICK_DB + TICK_GROWTH * (effort_db - TICK_EFFORT_REF_DB)
    db -= TICK_SPREAD_DB * np.log(u[:, 1] + 0.018)
    hz = TICK_LO_HZ + (TICK_HI_HZ - TICK_LO_HZ) * np.sqrt(u[:, 2])
    return np.transpose([start_s, db, hz, TICK_PUSH_DB + 14 * (u[:, 3] - .5)])


def snaps():
    """Big creases: a creak leads into a short ring, a crack of noise and a low push."""
    start_s, db, hz, push_db = np.vstack([BIG_SNAPS, ticks()]).T
    u = rng.random((len(start_s), 3))
    size = amp(db)
    wide = 1 / (1 + (hz / WIDE_HZ) ** 6)
    t = np.arange(-120, 500) / SR
    after = np.maximum(t, 0)

    creak = 0.093 * np.exp(t / 0.0011)
    burst = amp(-60 * after / (0.0013 + 0.0026 * u[:, 2:] ** 2)) + 0.093 * amp(-60 * after / 0.022)
    shape = np.where(t < 0, creak, burst)
    hiss = rng.standard_normal((len(start_s), len(t) + 1))
    thinning = np.clip(0.77 * hz[:, None] / 12000, 0, 1)  # high snaps crack thinner
    crack = (hiss[:, 1:] - thinning * hiss[:, :-1]) * shape
    crack *= np.linalg.norm(shape, axis=1).mean() / np.linalg.norm(crack, axis=1, keepdims=True)
    # the sheet shivers on, duller
    crack += 0.29 * uniform_filter1d(hiss[:, 1:], size=5, axis=1) * (t > 0) * amp(-60 * after / 0.011)
    crack *= (size * (1 - 0.4 * wide))[:, None]
    at = np.round((start_s[:, None] + t) * SR).astype(int)
    cracks = np.bincount(at.ravel(), crack.ravel(), N + SR)[:N]

    ring = grains(start_s, 1.58 * size, hz, 1.56, u[:, 0] / 4, count=96)
    for k in range(3):
        partial_hz = hz * (0.8 + 0.4 * u[:, k])
        ring += grains(start_s + 0.0012 * k, 0.3 * size * wide, partial_hz, WIDE_CYCLES, u[:, k - 1], count=500)
    push = grains(start_s, 1.8 * size * amp(push_db), 800 + 1200 * u[:, 1], 0.65, u[:, 2], count=256)
    return ring + push + 1.186 * cracks


def knocks():
    """Short hollow bumps: three damped partials each, scattered in pitch and onset."""
    start_s, db, hz = np.repeat(KNOCKS, 3, axis=0).T
    u = rng.random((len(start_s), 2))
    partial_hz = hz * np.exp(KNOCK_SPREAD * (2 * u[:, 1] - 1))
    onset_s = start_s + 0.00385 * u[:, 0]
    return grains(onset_s, amp(db), partial_hz, KNOCK_CYCLES, np.zeros(len(hz)), count=900)


def film():
    """Left port hears the film nearly straight; right one round the phone and off the table."""
    bed, near = crackle(), snaps() + amp(4.5) * knocks()
    source = bed + near
    room = echoes(np.pad(source, (130, 0))[:N], ROOM_DECAY, channels=2, size=SR // 4, count=1500)

    straight = 0.94 * source + 0.42 * echoes(source, NEAR_DECAY, channels=1, size=1024, count=600)[0]

    late = np.pad(bed + amp(-3.0) * near, (27, 0))[:N]
    direct = filtered(late, lambda f: (0.34 + 0.5 * np.exp(-2j * np.pi * f * TABLE_S)) / (1 + 1j * f / DIRECT_HZ))
    scattered = filtered(late, lambda f: f / (f - 1j * SCATTER_HZ))
    round_about = direct + 1.106 * echoes(scattered, NEAR_DECAY, channels=1, size=1024, count=600)[0]

    def left_gain(f):
        return amp(along(FILM_COLOUR, f) + along(PHONE_SHADOW, f) / 2 + 5.0) * bells(LEFT_BELLS, f)

    def right_gain(f):
        return amp(along(FILM_COLOUR, f) - along(PHONE_SHADOW, f) / 2 + 4.5) * bells(RIGHT_BELLS, f)

    left = coloured(straight + amp(-12.0) * room[0], left_gain)
    right = coloured(round_about + amp(-7.5) * room[1], right_gain)
    return np.array([left, right])


def pops():
    """Charge steps that leak away: backward spike first, swing past zero by the input high-pass."""
    out, t = np.zeros(N + SR), np.arange(SR // 4) / SR
    for start_s, db, direction, decay_ms in CHARGE_POPS:
        step = np.exp(-t * 1000 / decay_ms) * (1 - np.exp(-t / .00006))
        spike = np.exp(-t / .00003)
        fizz = 0.047 * rng.standard_normal(len(t)) * amp(-60 * t / 0.0019)
        out[round(start_s * SR) - 4:][:len(t)] += direction * amp(db) * (step - spike + fizz)
    return filtered(out[:N], lambda f: 1j * f / (1j * f + 35))  # 35 Hz high-pass


def scene():
    """Film and background at both ports, pops at the left."""
    return film() + background() + pops() * np.array([[1], [0]])


def record(dry, knee_db=-15, slope=0.72, back_db_per_s=17):
    """One gain for both ports drops with the peaks and climbs back steadily; then clip and band limit."""
    power = uniform_filter1d(np.max(dry ** 2, axis=0), size=16)
    loud_db = 10 * np.log10(np.abs(power) + 1e-12)
    wanted_db = np.maximum(slope * (np.minimum(loud_db, 3) - knee_db), 0)
    ramp_db = back_db_per_s * np.arange(N) / SR
    duck_db = np.maximum.accumulate(wanted_db + ramp_db) - ramp_db
    # the gain follows late, so the peak slips through
    duck_db = uniform_filter1d(duck_db, size=600, origin=299)
    clipped = np.clip(dry * amp(-duck_db), -.97, .97)
    return filtered(clipped, lambda hz: hz < TOP_HZ)


dry = scene()
out = record(dry)
materialize(out)
```